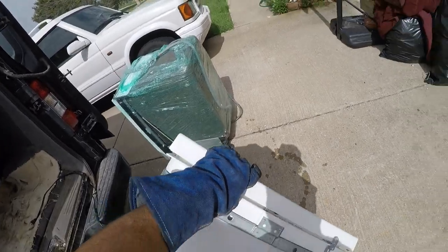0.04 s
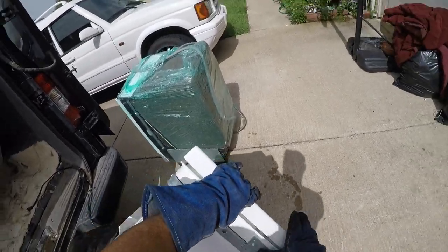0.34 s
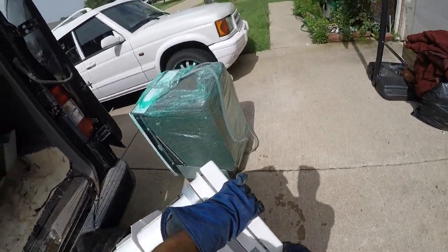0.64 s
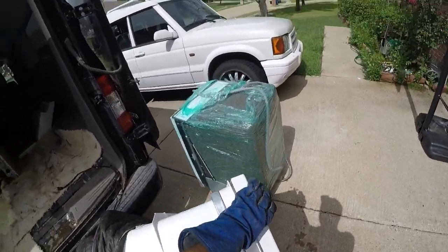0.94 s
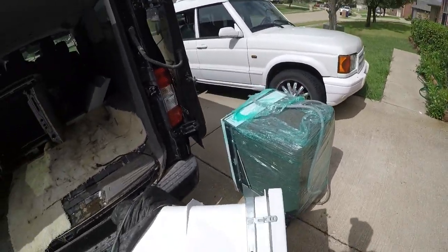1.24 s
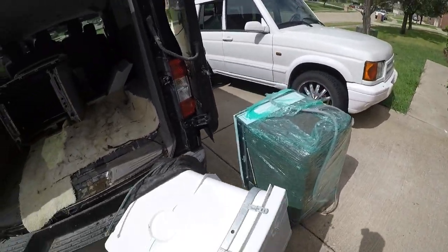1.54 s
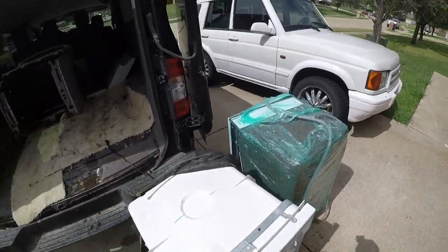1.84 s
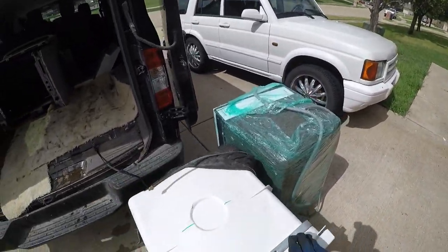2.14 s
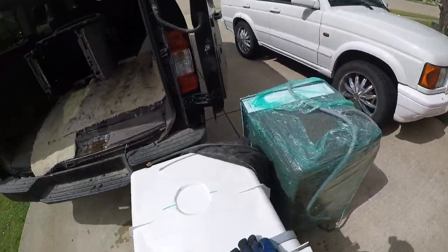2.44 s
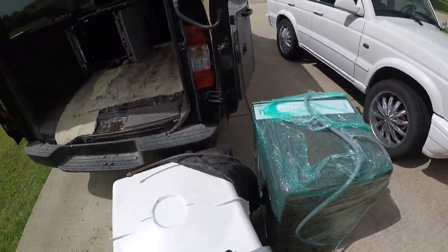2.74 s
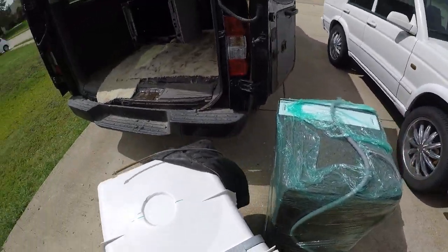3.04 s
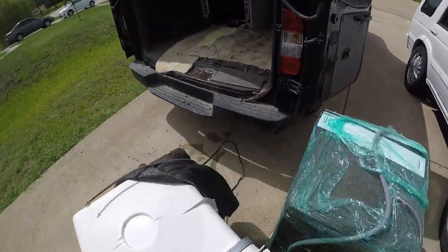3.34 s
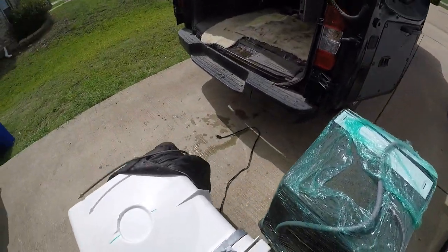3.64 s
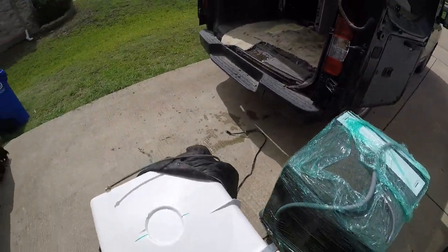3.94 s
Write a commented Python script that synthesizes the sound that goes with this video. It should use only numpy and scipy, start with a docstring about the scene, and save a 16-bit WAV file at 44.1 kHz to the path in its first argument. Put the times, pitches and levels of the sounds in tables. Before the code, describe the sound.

A heavy appliance is shifted on concrete outdoors: hollow knocks, a clink and rustling wrap come first, then a bang and three gritty, juddering drags with short metal groans. Faint wind rumbles on the close microphone.

```python
"""A plastic-wrapped sheet-metal appliance is moved over a concrete driveway, in light wind on a
body-worn microphone. First it is rocked: panels knock, a steel part clinks, the wrap crinkles.
A gust swells, and near 2 s the cabinet is set down with a bang. Then come three pulls: the feet
stick and slip, shaking the cabinet and grinding on grit, while the panels groan and knock."""
import sys
import numpy as np
from scipy import signal
from scipy.fft import irfft
from scipy.io import wavfile

SR = 44100
rng = np.random.default_rng(int(sys.argv[2]) if len(sys.argv) > 2 else 0)


def log_audio(samples):
    """Write samples as a 16-bit WAV file to the path given in sys.argv[1]."""
    # one column per channel
    frames = np.atleast_2d(samples).T
    # limit to full scale, then quantise
    limited = np.clip(frames, -1, 1)
    pcm = np.round(limited * 32767).astype(np.int16)
    wavfile.write(sys.argv[1], SR, pcm)


N = 176400
T = np.arange(N) / SR
TAIL = T[:26460]  # time axis of one ring-out
SOFT_ATTACK = np.minimum(TAIL / .001, 1)

# Stereo image of the two microphone ports. Each row: frequency in Hz, left minus right in dB.
BALANCE = [(250, -2), (550, -5.5), (1000, -5), (2000, -1.5), (4800, 0.6), (7000, -11), (12000, -1)]
# How alike the ports sound. Each row: frequency in Hz, likeness from 0 to 1.
LIKENESS = [(60, 0.89), (250, 1), (500, 0.98), (1000, 0.074), (3000, 0.6), (7000, 0.15)]

# Tone colours of the noise layers. Each row: frequency in Hz, spectral level in dB.
AIR_COLOUR = [(35, -26), (60, 2.5), (489, -14), (4370, -36.5), (6300, -34.5), (10400, -46.5), (14000, -77)]
WIND_COLOUR = [(6, -5.5), (14, -5), (28, -10.5), (100, -31), (1000, -100)]
FILM_COLOUR = [(500, 11), (1400, 9), (4800, 0), (6500, 2.5), (8000, -3), (10000, -13), (14000, -29)]
RUB_COLOUR = [(40, 8.5), (90, 2), (500, -9.5), (1500, -25.5), (4000, -56.5)]
CONTACT_COLOUR = [(2000, -10.5), (7000, 2), (11000, -16), (14500, -15)]
THUD_COLOUR = [(30, -32), (70, -3), (220, -3), (450, -11.5), (1500, -58)]
PANEL_COLOUR = [(100, -33), (250, 6), (500, 0.5), (1100, -5.5), (2000, -15), (4000, -67)]
CRACK_COLOUR = [(400, 21.5), (1500, 13.5), (4800, 1.5), (6200, 7.5), (7500, -1.5), (10000, -12),
                (14000, -57)]
SHUDDER_COLOUR = [(25, -32), (62, -3.5), (340, -7.5), (700, -18), (1150, -16.5), (1500, -23.5),
                  (2200, -32.5), (4000, -75)]
GRIT_COLOUR = [(600, -34), (1700, -2.5), (2300, -1.5), (5000, -4.5), (6000, -2), (7400, -8), (8200, -13),
               (11000, -27.5), (15000, -38)]

# Wind on the microphone. Each row: time in seconds, level in dB.
GUSTS = [(0, -23.5), (.88, -26), (.96, -18.5), (1.44, -26), (1.58, -13.5), (1.8, -30.5), (4, -25.5)]
# Hands on the wrap. Each row: time in seconds, crinkle level in dB, rub level in dB.
HANDLING = [(0, -57, -34), (.08, -36, -37.5), (.11, -32, -29.5), (.33, -38, -22.5), (.40, -45, -35),
            (.435, -31, -32), (.62, -50, -36.5), (.685, -46, -28), (.70, -30, -33), (.75, -47, -34.5),
            (.92, -50.5, -32.5), (1.10, -40, -30.5), (1.125, -39.5, -21.5), (1.22, -41, -29.5),
            (1.33, -43, -20.5), (1.76, -39, -35.5), (1.80, -25.5, -26.5), (1.84, -36, -28.5),
            (1.94, -47, -29.5), (2.54, -71, -34.5), (2.575, -29.5, -24), (2.65, -85, -30)]
CRINKLES_PER_S, CRINKLE_SCATTER_DB, CRINKLE_T60_S = 980, 7.5, 0.068

# Short bright contacts: a steel clink, a tick at the bang and a scratch during the drag.
# Each row: start in seconds, level in dB, chatter t60 in seconds.
CONTACTS = [(0.423, -25.5, 0.1), (1.9749, -16.5, 0.022), (3.523, -24, 0.046)]
# The high ring they share. Each row: pitch in Hz, level in dB.
CONTACT_MODES = [(5900, -7), (6350, -2), (7400, -8)]
# Panel groans. Each row: midpoint in seconds, length in seconds, pitch in Hz, level in dB.
GROANS = [(0.161, 0.02, 967, -28.5), (2.758, 0.059, 509, -15), (2.926, 0.097, 1087, -29.5),
          (2.977, 0.1, 160, -19), (3.054, 0.17, 61.7, -17.5), (3.08, 0.09, 772, -26.5),
          (3.227, 0.029, 519, -23), (3.45, 0.037, 223, -18.5), (3.602, 0.072, 362, -15.5),
          (3.853, 0.059, 345, -25)]
GROAN_SLIPS_PER_S, GROAN_T60_S = 600, .085

# The sheet-metal box's modes. Each row: pitch in Hz, base level in dB, base t60 in seconds.
CABINET_MODES = [(84.5, 4.5, 0.27), (199.8, 1, 0.55), (288.4, -5, 0.26), (367, -3.5, 0.12),
                 (526, -4.5, 0.26), (750.7, -5.5, 0.32), (868, -3.5, 0.25), (943, -16, 0.3),
                 (1128, -8, 0.15)]
# Blows to the box. Each row: start in seconds, thud level in dB, panel level in dB,
# favoured panel pitch in Hz, crack level in dB, crack centre in Hz.
KNOCKS = [(0.094, -35, -24.5, 520, -27, 2000), (.159, -36, -30, 1000, -31, 1800),
          (0.195, -14, -42, 286, -24, 2240), (0.303, -16, -27.5, 570, -17, 1500),
          (.314, -19.5, -25.5, 400, -20, 1600), (0.339, -23, -47, 704, -22.5, 1710),
          (0.422, -27, -21.5, 447, -33, 5070), (.712, -26.5, -17, 930, -23, 1670),
          (1.245, -48, -14.5, 534, -27.5, 1700), (1.294, -32, -17.5, 520, -24, 1640),
          (1.315, -12, -14, 255, -19, 1500), (1.976, -8.5, -10.5, 630, -13, 1490),
          (1.976, -18, -14, 270, -32, 1500), (2.074, -24, -19, 750, -17.5, 1700),
          (2.402, -40, -22, 1160, -30, 1600), (2.417, -25.5, -31, 1130, -23, 2070),
          (2.682, -18, -22, 344, -24.5, 5900), (2.753, -12.5, -13.5, 503, -16.5, 6000),
          (2.941, -39, -15, 350, -13.5, 6700), (3.402, -25, -19, 834, -22.5, 2520),
          (3.934, -16, -11.5, 500, -17, 3160)]
THUD_HZ, THUD_T60_S, THUMP_HZ, THUMP_T60_S = 88.4, 0.24, 154, 0.043
PANEL_T60_S, FAVOUR_OCTAVES = 0.14, 0.14

# The drag, one table a pull. Each row: time in seconds, shudder level in dB, grit level in dB.
PULLS = [
    [(1.98, -21, -25.5), (2.04, -18.5, -29.5), (2.11, -20, -34), (2.17, -22, -38.5), (2.26, -23.5, -51.5),
     (2.36, -43, -53), (2.55, -26, -40.5), (2.64, -38.5, -49.5)],
    [(2.66, -24.5, -51), (2.70, -17.5, -34.5), (2.77, -13.5, -25.5), (2.82, -19, -33.5),
     (2.88, -23.5, -40.5), (2.92, -14, -33.5), (2.95, -13.5, -25.5), (2.99, -17, -28), (3.10, -15, -22.5),
     (3.15, -25.5, -41), (3.22, -23, -38), (3.30, -39, -64)],
    [(3.31, -35.5, -56), (3.35, -28, -48), (3.395, -25.5, -57), (3.403, -6.5, -22.5), (3.45, -21, -24.5),
     (3.50, -16, -33), (3.58, -13.5, -22), (3.76, -14.5, -26), (4.0, -15.5, -25)],
]
SLIPS_PER_S, SLIP_SCATTER_DB, SHUDDER_T60_S = 45, 3.5, 0.13  # typical rate for one foot
GRIT_PER_S, GRIT_SCATTER_DB, GRIT_T60_S = 2000, 3.5, .025


def undb(db):
    """Decibels to gain."""
    return 10 ** (np.asarray(db) / 20)


def unit(x):
    """Scale to rms 1."""
    return x / np.sqrt(np.mean(x ** 2))


def along(points, hz):
    """Read a table on a log-frequency axis."""
    p = np.array(points)
    return np.interp(np.log(np.maximum(hz, 1)), np.log(p[:, 0]), p[:, 1])


def fader(rows, column=1):
    """Ride the gain along a dB column; silent outside the table."""
    p = np.array(rows)
    return undb(np.interp(T, p[:, 0], p[:, column], left=-120, right=-120))


def fade(t60):
    """Exponential decay, 60 dB down after t60 seconds."""
    return np.exp(-np.log(1000) * TAIL / max(t60, .001))


def wander(per_s=7):
    """A gain that swells and sinks at random, rms 1."""
    knots = np.arange(0, T[-1] + 1, 1 / per_s)
    return unit(undb(9 * np.interp(T, knots, rng.uniform(-2.35, 1, len(knots)))))


def noise(colour, size=len(TAIL)):
    """Coloured noise as the two ports hear it."""
    hz = np.arange(size // 2 + 1) * SR / size
    mid, side = np.exp(2j * np.pi * rng.random((2, len(hz))))
    like, sign = along(LIKENESS, hz), np.array([[1], [-1]])
    ports = mid * np.sqrt(1 + like) + sign * side * np.sqrt(1 - like)
    return unit(irfft(ports * undb(along(colour, hz) + sign * along(BALANCE, hz) / 2), size))


def peaked_noise(colour, hz, octaves):
    """Coloured noise with a bell boost at one frequency."""
    grid = np.geomspace(20, SR / 2, 120)
    bell_db = 9 * np.exp(-(np.log2(grid / hz) / octaves) ** 2 / 2)
    return noise(np.c_[grid, along(colour, grid) + bell_db])


def ring(modes):
    """Struck modes (Hz, dB, t60); higher ones reach the ports out of step."""
    out, power, sign = 0, 0, np.array([[1], [-1]])
    for hz, db, t60 in modes:
        phase = 2 * np.pi * rng.random() + sign * np.arccos(along(LIKENESS, hz)) / 2
        gain = undb(db + sign * along(BALANCE, hz) / 2)
        out += gain * np.sin(2 * np.pi * hz * TAIL + phase) * fade(t60)
        power += undb(db) ** 2 / 2
    return out / np.sqrt(power)


def clicks(per_s, scatter_db):
    """Randomly timed impulses of scattered size, rms 1."""
    hits = rng.random(N) < per_s / SR
    sizes = undb(scatter_db * np.clip(rng.standard_normal(N), -2, 2))
    return unit(hits * sizes * rng.choice([-1, 1], N))


def through(force, response):
    """Play a force through a response of unit energy."""
    return signal.fftconvolve(force[None], unit(response) / np.sqrt(len(TAIL)), axes=1)[:, :N]


def add(out, at, sound):
    """Mix a sound in at a time in seconds."""
    i = int(at * SR)
    out[:, i:i + sound.shape[1]] += sound[:, :N - i]


def outdoors():
    """Slow wind buffets the microphone over a quiet bed of air."""
    return noise(WIND_COLOUR, size=N) * fader(GUSTS) + undb(-38.5) * noise(AIR_COLOUR, size=N)


def handling(layers=3):
    """Stretch film crinkles and gloves rub dully on the hollow cabinet."""
    out = 0
    for _ in range(layers):
        film = clicks(CRINKLES_PER_S / layers, CRINKLE_SCATTER_DB) * fader(HANDLING, column=1)
        rub = clicks(per_s=120, scatter_db=6) * fader(HANDLING, column=2)
        out += through(film, noise(FILM_COLOUR) * fade(CRINKLE_T60_S) * SOFT_ATTACK)
        out += through(rub, noise(RUB_COLOUR) * fade(0.17) * (1 - fade(0.00087)))
    return out / np.sqrt(layers)


def bright_contacts():
    """A clink, a tick and a scratch: each is a bright chatter with a ring that lasts twice as long."""
    out = np.zeros((2, N))
    for at, db, t60 in CONTACTS:
        tone = ring([(hz, mode_db, 2 * t60) for hz, mode_db in CONTACT_MODES])
        chatter = noise(CONTACT_COLOUR) * fade(t60)
        add(out, at, undb(db) * (0.78 * tone + chatter))
    return out


def groans():
    """For a moment a chattering foot drives one panel resonance; which one changes as the load shifts."""
    out = 0
    for at, length, hz, db in GROANS:
        swell = np.cos(np.pi * np.clip((T - at) / length, -.5, .5))
        slips = clicks(GROAN_SLIPS_PER_S, SLIP_SCATTER_DB) * swell
        groan = through(slips, ring([(hz, 0, GROAN_T60_S)]) * SOFT_ATTACK)
        out += undb(db) * unit(groan) * np.sqrt(length / T[-1])
    return out


def thud():
    """The low end of a knock: the box booms and rattles, and the floor pan takes the first shock."""
    boom = ring([(THUD_HZ * (1 + 0.036 * rng.standard_normal()), 0, THUD_T60_S)])
    rattle = noise(THUD_COLOUR) * fade(THUD_T60_S)
    floor_pan = ring([(THUMP_HZ, 0, THUMP_T60_S)])
    return boom + undb(-7.5) * rattle + undb(-4) * floor_pan


def panel(favoured_hz):
    """The mids of a knock: sheet metal rings and clatters, most near the pitch the blow favours."""
    modes = []
    for hz, db, t60 in CABINET_MODES:
        octaves_off = abs(np.log2(hz / favoured_hz))
        modes.append((hz, db / 2 - 20 * np.tanh(octaves_off / FAVOUR_OCTAVES), t60))
    tone = ring(modes)
    clatter = peaked_noise(PANEL_COLOUR, favoured_hz, FAVOUR_OCTAVES) * fade(PANEL_T60_S)
    return undb(-9) * tone + clatter


def knocks():
    """Each blow thumps the box, rings the panels and cracks at the contact."""
    out = np.zeros((2, N))
    body_attack = 1 - fade(0.007)
    crack_shape = (fade(0.02) + undb(-8) * fade(.16)) * SOFT_ATTACK  # a snap and a softer tail
    for at, thud_db, panel_db, favoured_hz, crack_db, crack_hz in KNOCKS:
        body = undb(thud_db) * thud() + undb(panel_db) * panel(favoured_hz)
        crack = undb(crack_db) * peaked_noise(CRACK_COLOUR, crack_hz, octaves=1)
        add(out, at, body * body_attack + crack * crack_shape)
    return out


def stick_slip():
    """One foot sticks and slips at uneven intervals; every slip is a short jolt."""
    gap, size = rng.standard_normal((600, 2)).T
    at = (np.cumsum(np.exp(gap / 2)) * SR / SLIPS_PER_S).astype(int)
    jolts = np.zeros(N)
    jolts[at[at < N]] = undb(SLIP_SCATTER_DB * np.clip(size[at < N], -1.5, 1.5))
    return unit(jolts)


def grinding(jolts, gain, grains_per_s):
    """A foot crushes grit in uneven patches, most just after each slip."""
    sliding = unit(signal.fftconvolve(jolts, fade(0.21))[:N])
    grains = unit(clicks(grains_per_s, GRIT_SCATTER_DB) * (1 + 1.2 * sliding))
    patches = unit(np.sqrt(wander()))
    return through(grains * gain * patches, noise(GRIT_COLOUR) * fade(GRIT_T60_S) * SOFT_ATTACK)


def dragging(feet=4):
    """The slipping feet grind over the concrete and make the cabinet shudder and ring."""
    out, shaking = 0, 0
    shudder_gain = sum(fader(pull, column=1) for pull in PULLS)
    grit_gain = sum(fader(pull, column=2) for pull in PULLS)
    for _ in range(feet):
        jolts = stick_slip()
        force = jolts * shudder_gain
        shaking += force
        shudder = through(force, noise(SHUDDER_COLOUR) * fade(SHUDDER_T60_S) * SOFT_ATTACK)
        out += shudder + grinding(jolts, grit_gain, GRIT_PER_S / feet)
    for hz, db, t60 in CABINET_MODES:  # as the load shifts, the modes take turns
        mode = ring([(hz, 0, t60 / 2)]) * SOFT_ATTACK  # damped by the ground
        out += undb(db - 10) * through(shaking * wander(), mode)
    return out / np.sqrt(feet)


def scene():
    """The driveway mix, from the wind up to the drag."""
    return outdoors() + handling() + bright_contacts() + groans() + knocks() + dragging()


def record(dry):
    """Block drift, close without a click, round the loudest peaks and cut the top."""
    low_cut = signal.butter(1, 8, "high", fs=SR, output="sos")
    high_cut = signal.ellip(8, .2, 70, 14500, fs=SR, output="sos")
    fade_out = np.minimum((T[-1] - T) / .002, 1)
    centred = signal.sosfilt(low_cut, dry) * fade_out
    rounded = 1.15 * np.tanh(centred / 1.15)
    return signal.sosfilt(high_cut, rounded)


dry = scene()
out = record(dry)
log_audio(out)
```